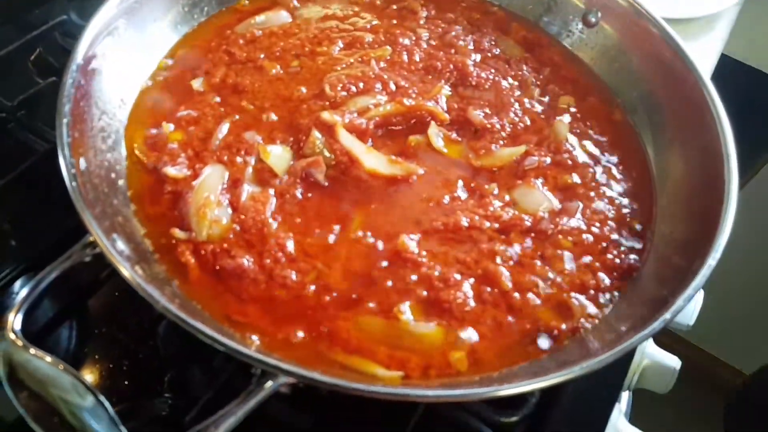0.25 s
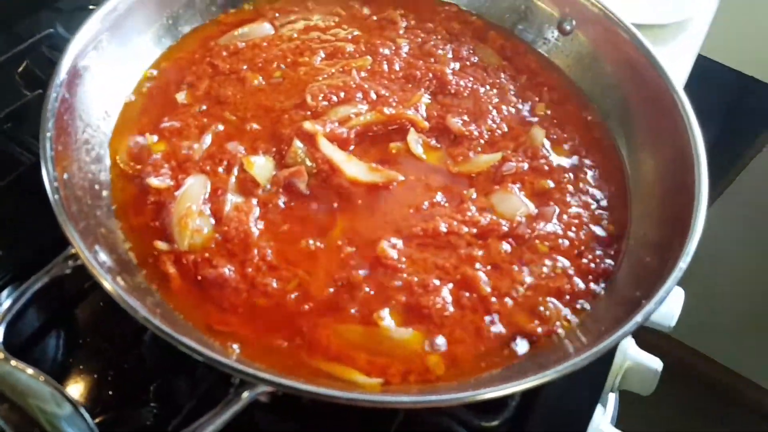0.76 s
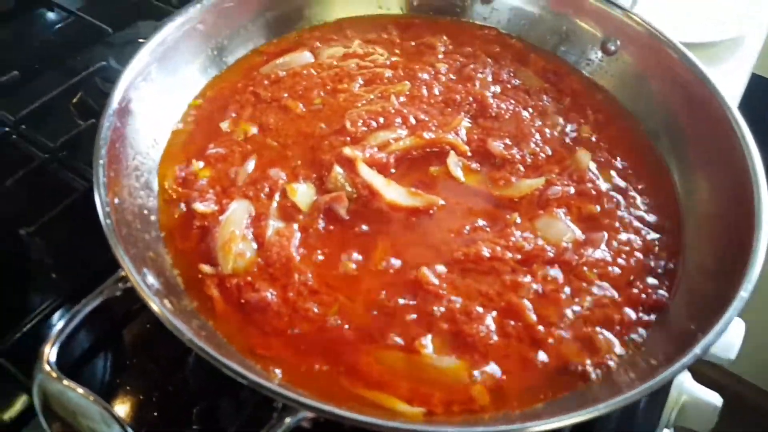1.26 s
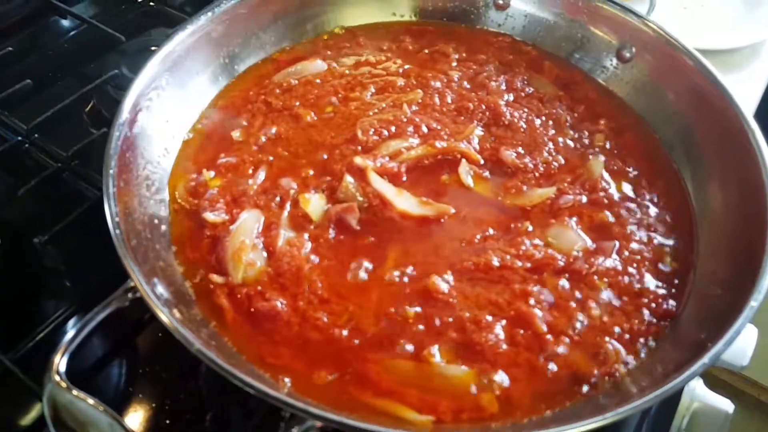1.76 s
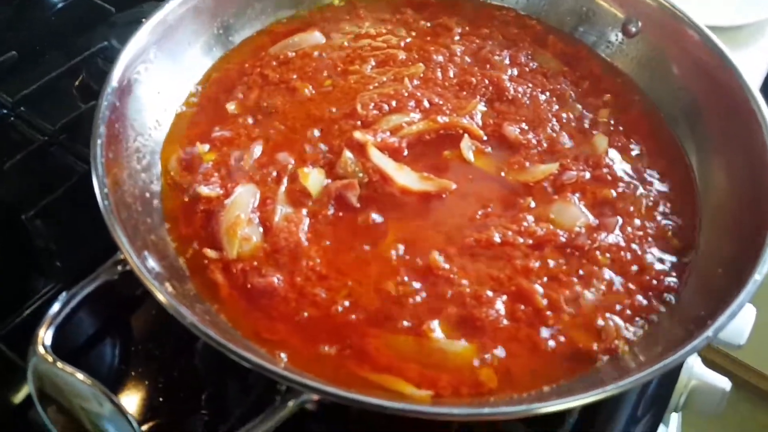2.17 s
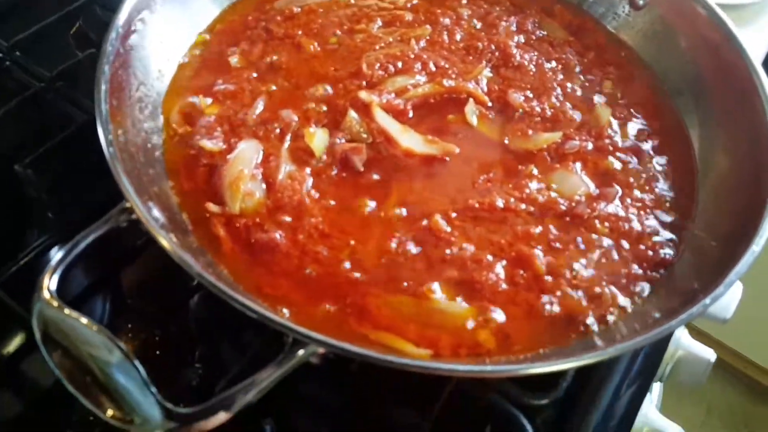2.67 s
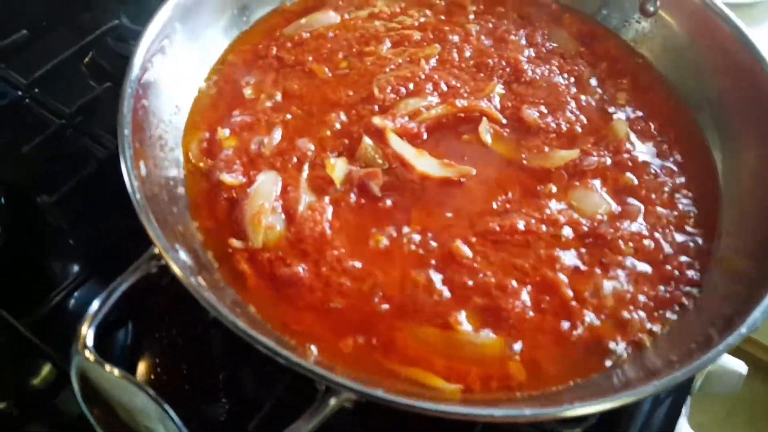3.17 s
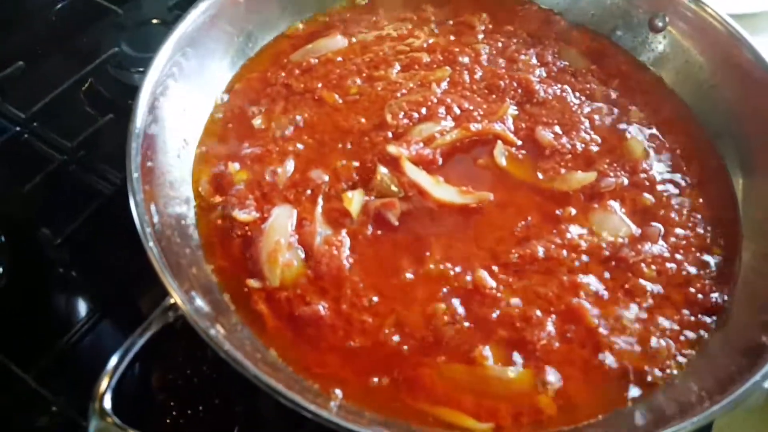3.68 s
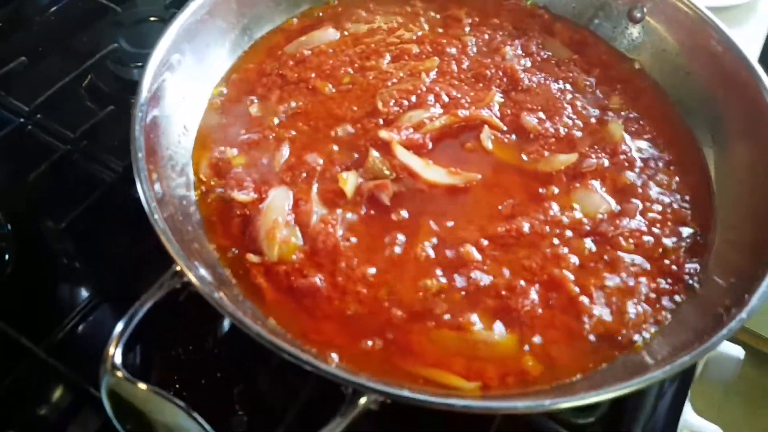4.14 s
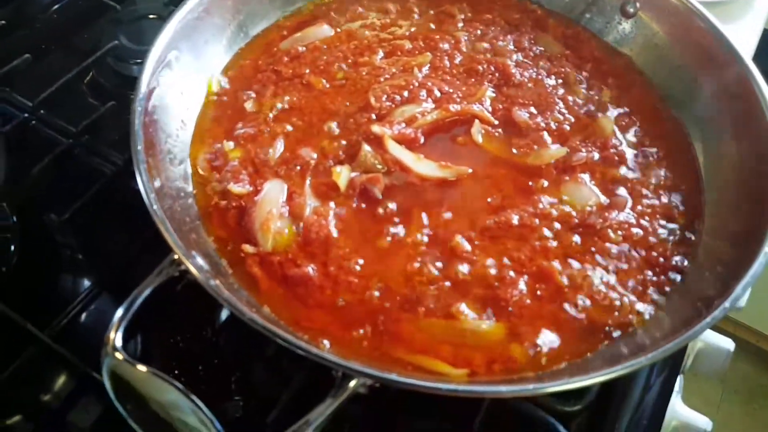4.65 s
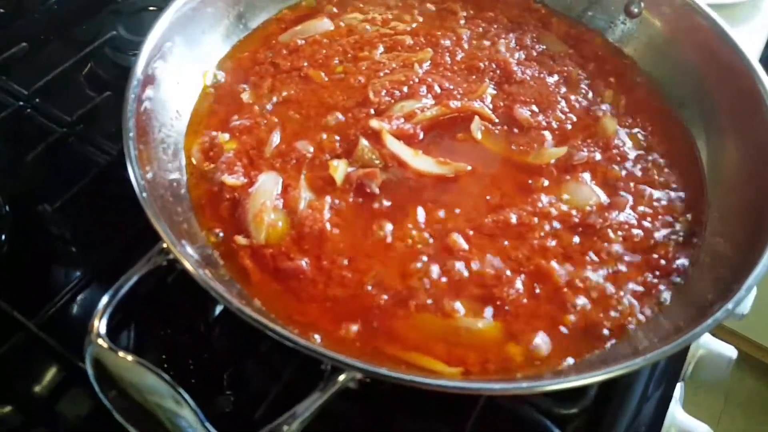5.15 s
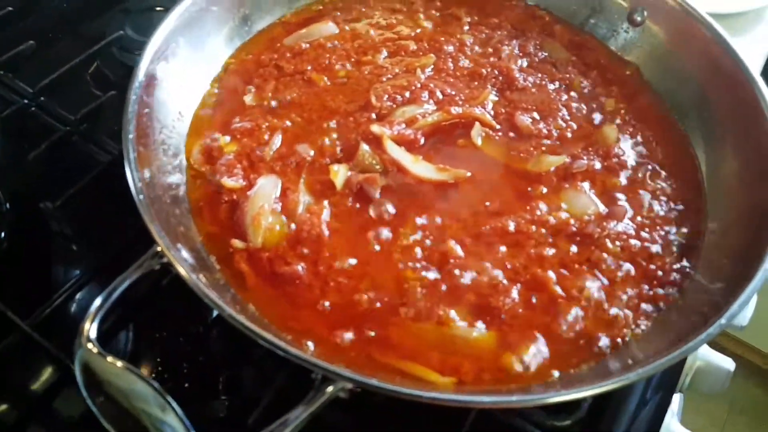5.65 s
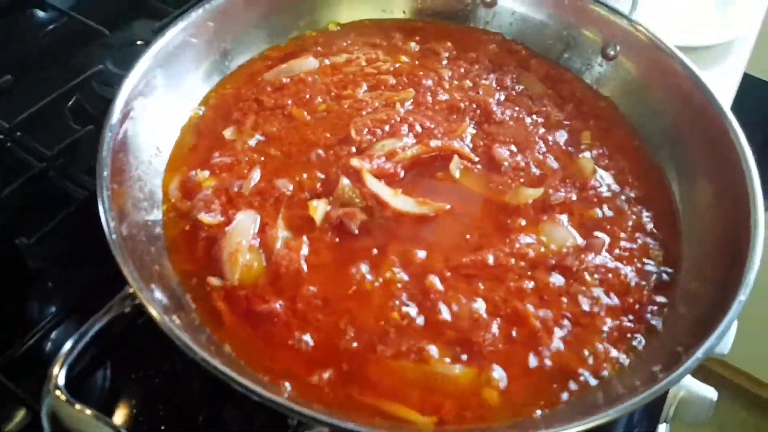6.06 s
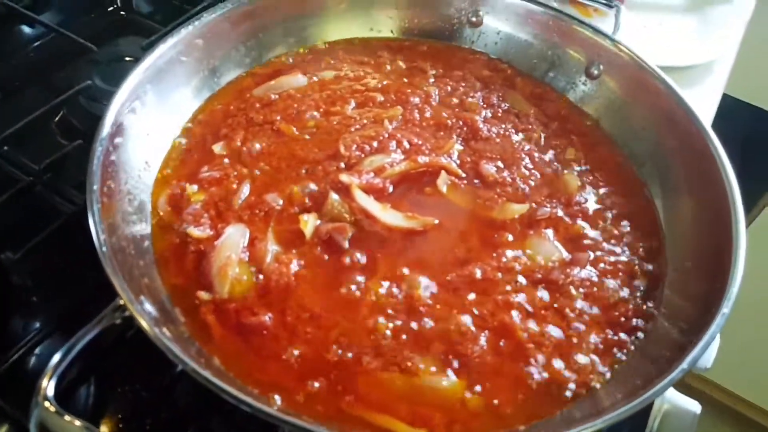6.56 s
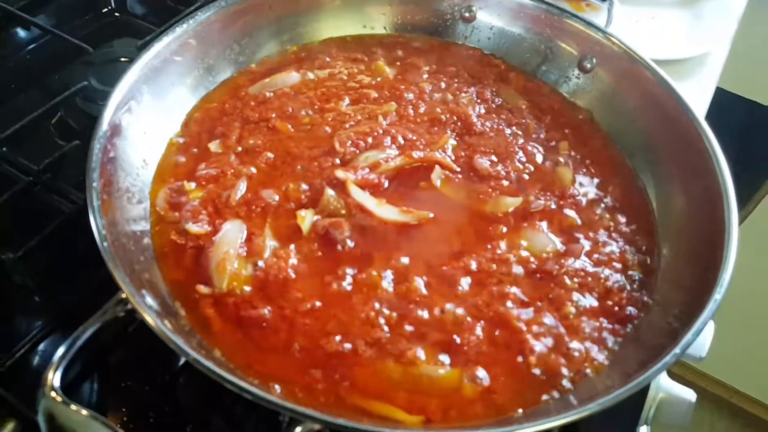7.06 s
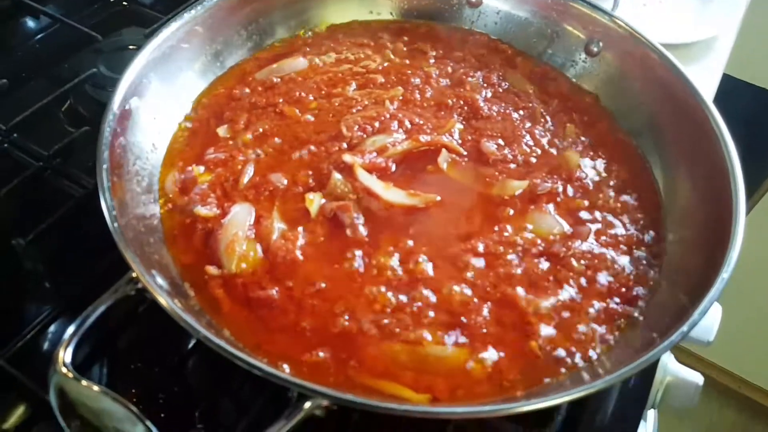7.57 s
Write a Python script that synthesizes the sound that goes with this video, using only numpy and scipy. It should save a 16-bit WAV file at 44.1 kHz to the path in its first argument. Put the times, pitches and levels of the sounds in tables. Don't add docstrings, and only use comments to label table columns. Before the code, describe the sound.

Close in a home kitchen, thick stew simmers steadily with steamy hiss, fine crackle and wet pops. Crockery clatters behind at the start and most heavily near 2.7 seconds. A hand-held stereo microphone, left side half covered by a finger, rumbles with low puffs. A hard knock at 3.4 seconds makes the simmer drop and slowly return; another near the end drops it again.

```python
import sys
import numpy as np
from scipy import signal
from scipy.fft import rfft, irfft, next_fast_len
from scipy.io import wavfile
from scipy.ndimage import uniform_filter1d, map_coordinates

SR = 44100
rng = np.random.default_rng(int(sys.argv[2]) if len(sys.argv) > 2 else 0)


def store_wav(level_fs):
    pcm = np.round(np.clip(np.atleast_2d(level_fs), -1, 1) * 32767)
    wavfile.write(sys.argv[1], SR, pcm.T.astype(np.int16))


def rack_gain(trim_db):
    fader = np.asarray(trim_db, float)
    return 10 ** (fader / 20)


N = 344862

# t/s, level/dB
GAIN_CURVE = [(0, -44), (.8, -43), (1.4, -43.5), (2, -45.5), (2.8, -43.5), (3.43, -45), (3.47, -49),
              (4.1, -51.5), (5.7, -51.5), (7.21, -44.5), (7.25, -50.5), (7.82, -51.5)]
# f/Hz, level/dB
BUFFET_SPECTRUM = [(12, -48), (28, -5), (45, 6), (65, 0.5), (100, -4.5), (160, -18), (250, -60), (500, -58),
                   (1000, -120)]
OPEN_DB = -46


def unit(x):
    return x / np.sqrt(np.mean(x ** 2) + 1e-20)


def along(points, hz):
    f, v = np.transpose(points)
    return np.interp(np.log(hz + 1), np.log(f + 1), v)


def wobble(rate):
    return map_coordinates(rng.standard_normal(int(N * rate / SR) + 4), [np.arange(N) * rate / SR])


def filtered(x, gain_db):
    m = next_fast_len(N + 8192)
    return irfft(rfft(x, m) * rack_gain(gain_db(np.fft.rfftfreq(m, 1 / SR))), m)[..., :N]


def add(track, s, sound):
    track[..., max(round(s * SR), 0):][..., :sound.shape[-1]] += sound


def lump(u, length, rise, fall):
    return np.exp(-.5 * (u / (length * np.where(u < 0, rise, fall))) ** 2)


def burst(hz, octaves, size):
    f = np.fft.rfftfreq(size, 1 / SR) + 1
    bell = np.exp(-.5 * (np.log2(f / hz) / max(octaves, .05)) ** 2)
    a, b, lumps = rng.standard_normal((3, size))
    lumps = rack_gain(1.5 * unit(uniform_filter1d(lumps, size=60)))
    ports = np.array([.8 * a + .6 * b, a])
    return unit(irfft(rfft(lumps * ports) * bell, size))


def steam_hiss(patchy_db):
    z = signal.stft(rng.standard_normal((2, N)), nperseg=512)[2]
    field = uniform_filter1d(rng.standard_normal(z.shape[1:]), size=8, axis=0)
    field = uniform_filter1d(field, size=8, axis=1)
    return signal.istft(z * rack_gain(patchy_db * unit(field)), nperseg=512)[1][:, :N]


def tiny_bubbles(rate, spread_db):
    when, size, pitch = rng.random((3, 4000))
    live = np.arange(4000) < rate * N / SR
    level = live * rack_gain(-spread_db * np.log(size + 0.03))
    t = np.arange(64) / SR
    hz = 8800 * 2 ** (1.5 * (pitch[:, None] - .5))
    ring = np.sin(2 * np.pi * hz * t) * hz * t * np.exp(-hz * t / 0.68)
    grain = level[:, None] * ring
    spot = (when[:, None] * (N - 64)).astype(int) + np.arange(64)
    return np.bincount(spot.ravel(), grain.ravel(), N)


def simmer(rate, spread_db, grain_db, patchy_db):
    # f/Hz, level/dB
    simmer_spectrum = [(80, -120), (150, 1), (220, -3), (350, 3), (600, -0.5), (1000, -5.5), (1600, -0.5),
                       (2800, -9.5), (5000, -6), (7000, -12), (10000, -12.5), (14000, -12), (15400, -21),
                       (16400, -26)]
    hiss = unit(steam_hiss(patchy_db))
    crackle = rack_gain(grain_db) * tiny_bubbles(rate, spread_db) * [[.6], [1]]
    swell = rack_gain(.7 * wobble(9))
    return swell * unit(filtered(hiss + crackle, lambda f: along(simmer_spectrum, f)))


def blurps(count):
    out, t = np.zeros(N + SR), np.arange(4096) / SR
    when, size, pitch = rng.random(count) * N / SR, *rng.standard_normal((2, count))
    levels = -13 + 3 * np.tanh(size)
    pitches = np.clip(1000 * 2 ** pitch, SR / 180, SR / 10)
    for s, db, hz in zip(when, levels, pitches):
        life = hz * t / 14
        phase = 2 * np.pi * hz * t * (1 + .06 * life / 2)
        add(out, s, rack_gain(db) * 8 * life * np.exp(-3 * life) * np.sin(phase))
    return out[:N]


def strays(count, octaves):
    when, size, pitch = rng.random(count) * (N / SR - .1), *rng.standard_normal((2, count))
    db = np.interp(when, *np.transpose(GAIN_CURVE)) - 9 + 3 * size
    hz = np.clip(9500 * 2 ** (0.45 * pitch), SR / 12, SR / 3)
    return list(zip(when, db, hz, np.full(count, octaves)))


def spits():
    # t/s, level/dB, centre f/Hz, width/octaves
    tears = [(0.265, -39.5, 2000, 2), (0.6688, -36.5, 6800, 4.9), (0.7586, -44, 7100, 1.7),
             (0.8233, -39, 7040, 0.82), (1.095, -42, 7010, 0.53), (1.137, -44, 6980, 0.29),
             (1.47, -35.5, 8000, 3.2), (1.506, -46, 12000, .4), (1.5276, -39.5, 3140, 1.3),
             (1.587, -41, 2890, 0.94), (1.7092, -42, 8060, 1.9), (2.4292, -37.5, 3380, 1.8),
             (2.5471, -46, 7160, 1.2), (2.7647, -34, 6650, 1), (2.8673, -30.5, 3800, 1.4),
             (2.956, -38, 3360, 0.36), (3.0195, -33, 7000, 2.5), (3.4256, -45.5, 3610, 1.1),
             (4.185, -49.5, 2980, 0.64), (4.6004, -52, 4950, 1), (5.03, -41, 11500, 1.1),
             (5.094, -45, 6710, 1.1), (5.4075, -51, 10500, .4), (5.564, -51, 6690, .91),
             (5.7793, -39, 11000, 0.93), (6.0945, -45, 10780, 0.59), (6.2873, -45, 7550, .74),
             (6.32, -45, 3370, 2.3), (6.903, -31.5, 12000, 1.1), (6.945, -31.5, 4000, 0.81),
             (2.2937, -48, 8058, 0.37), (3.2834, -59, 5320, .5), (3.3657, -52, 8250, .4),
             (4.468, -57, 8200, .3), (4.566, -53, 9500, .4), (4.608, -57, 11000, .5),
             (4.662, -64, 8500, .4), (4.786, -62, 6500, 0.52), (4.905, -54, 7005, .5),
             (5.0569, -58, 9500, 0.56), (5.414, -55, 10490, .4), (5.719, -54, 8500, .3),
             (5.743, -56, 10500, .4), (6.1917, -52, 6500, 0.46), (6.2357, -50, 11500, 0.54),
             (6.567, -48, 8200, .2)]
    # t/s, level/dB, f/Hz
    pings = [(.178, -48, 3650), (0.572, -46, 1450), (1.0455, -53, 5590), (1.2595, -37, 8200),
             (1.4937, -34.5, 7400), (1.7853, -48, 6300), (1.8852, -42, 3570), (2.078, -47, 3320),
             (2.726, -52, 8540), (3.027, -44, 4270), (3.3862, -49, 6880), (3.71, -59, 5690),
             (4.0098, -49, 4550), (4.215, -49, 8750), (4.7197, -44.5, 9490), (5.237, -51, 7050),
             (5.436, -52, 9600), (5.4597, -41.5, 6400), (5.617, -53, 8330), (5.6855, -49, 6660),
             (5.989, -50, 5700), (6.044, -49, 9270), (6.121, -45, 8100), (6.7396, -27, 5140),
             (7.0484, -41, 7540), (7.0738, -44, 6400), (7.1477, -47, 8500), (7.1731, -41, 11700),
             (7.7403, -49, 11400), (7.7638, -49, 7540)]
    ping_octaves, stray_octaves = .11, 0.46
    out, t = np.zeros((2, N + SR)), np.arange(4096) / SR
    bubbles = tears + [(*ping, ping_octaves) for ping in pings] + strays(200, stray_octaves)
    for s, db, hz, octaves in bubbles:
        click = np.sin(2 * np.pi * hz * t) * np.sqrt(t) * np.exp(-2.4 * octaves * hz * t)
        spray_db = 1.8 - 0.46 * max(db + 45.5, 0)
        spray_db -= 6 * (octaves == stray_octaves)
        spray_db -= 0.5 * np.log2(hz / 5960)
        spray_db -= 4 * min(octaves, 1)
        decay = rack_gain(spray_db - 60 * t / 0.084)
        tail = decay * (1 - np.exp(-t / 0.0004)) * burst(hz, octaves, size=4096)
        add(out, s + 0.00071, rack_gain(db) * (11 * click / np.linalg.norm(click) + tail))
    return out[:, :N]


def steam_puffs():
    # t/s, peak level/dB, f/Hz, length/s
    puffs = [(0.405, -19, 54.5, 0.031), (0.579, -13.5, 46.4, 0.03), (0.691, -12.5, 78, 0.0051),
             (0.924, -11, 57.3, 0.019), (1.302, -13.5, 57.3, .012), (1.48, -18.5, 46.8, 0.11),
             (1.956, -11, 63.6, 0.0099), (2.17, -17, 45.5, 0.046), (2.257, -18, 67, 0.0088),
             (2.387, -14, 54.3, 0.023), (2.574, -12.5, 75, 0.0062), (2.68, -10.5, 89, 0.012),
             (2.762, -10.5, 58, 0.0034), (3.044, -15, 52, .025), (3.133, -10, 59, 0.026),
             (3.545, -14, 44.2, 0.033), (3.82, 1.5, 49.4, 0.03), (3.987, -11, 61, 0.021),
             (3.703, -4.5, 47, 0.027), (5.185, -20.5, 45.6, .028), (5.703, -16, 43, 0.026),
             (6.308, -19, 61, 0.031), (6.342, -8.5, 84.4, 0.014), (6.465, -18, 61.5, 0.029),
             (6.614, -21, 87.4, 0.05), (6.92, -9, 45, 0.053), (6.89, -15, 100, .015),
             (6.982, -19.5, 53, 0.056), (7.101, -13.5, 67.5, 0.019), (7.304, -6, 66.3, 0.013)]
    # t/s, peak level/dB
    wafts = [(.019, -27), (0.104, -21), (0.462, -21), (0.845, -14), (1.113, -20.5), (1.411, -21),
             (1.543, -17.5), (1.679, -23), (1.878, -20), (2.629, -16), (2.855, -17.5), (4.389, -19),
             (4.694, -25), (4.777, -34), (5.092, -25), (5.365, -23.5), (5.511, -23.5), (5.578, -21.5),
             (5.84, -24), (6.06, -23), (6.691, -17), (6.873, -14), (7.174, -14), (7.669, -25)]
    waft_hz, waft_s = 61, 0.018
    out, u = np.zeros(N + SR), np.arange(8192) / SR - .06
    for s, db, hz, length in puffs + [(*waft, waft_hz, waft_s) for waft in wafts]:
        swing = np.cos(2 * np.pi * (hz * u + rng.random()))
        add(out, s - .06, rack_gain(db - 3.3) * lump(u, length, .35, .55) * swing)
    return out[:N]


def finger_knocks():
    # t/s, peak level/dB, quick extra turns/cycles, glide/s, edge/s
    knocks = [
        (3.446, 1.6, 0.48, 0.0064, 0.00043),
        (4.3234, -7, 0.46, 0.002, 0.00031),
        (4.999, -24.5, 0.37, 0.0011, 0.00039),
        (6.869, -12.5, 0.44, 0.0037, 0.00058),
        (7.222, 1, 0.85, 0.014, 0.00014),
    ]
    out, t = np.zeros(N + SR), np.arange(8192) / SR
    for s, db, turns, glide, edge in knocks:
        t60 = min(43 * glide, 0.16)
        u = np.maximum(t - .004, 0)
        jump = np.exp(np.minimum(t - .004, 0) / edge)
        late = 1 - min(edge / 0.00077, .7) * np.exp(-u / 0.0044)
        cycles = 41 * u + turns * (1 - np.exp(-u / glide))
        knock = rack_gain(db - 60 * u / t60) * jump * late * np.cos(2 * np.pi * cycles)
        soft = np.exp(-.5 * ((t[:128] - t[64]) / (0.23 * edge)) ** 2)
        add(out, s - .004, np.convolve(knock, soft / soft.sum())[64:])
    return out[:N]


def finger_taps():
    # t/s, peak level/dB, f/Hz, length/s
    taps = [(3.444, -19, 1570, 0.00045), (3.6869, -15.5, 210, 0.0014), (4.3, -31, 1700, .0005),
            (5.7, -25, 1200, .0004), (3.795, -35.5, 300, 0.0021), (3.957, -35, 630, 0.0019),
            (4.236, -42, 500, .002), (3.96, -16.5, 74, 0.0084), (4.239, -11.5, 66, 0.017),
            (6.4, -35, 600, .001), (6.3313, -11, 370, 0.0018), (6.362, -40, 1000, 0.0007),
            (6.33, -29, 520, 0.0026)]
    out, u = np.zeros(N + SR), np.arange(8192) / SR - .02
    for s, db, hz, length in taps:
        add(out, s + u[0], rack_gain(db) * lump(u, length, 0.18, 1) * np.cos(2 * np.pi * hz * u))
    return out[:N]


def steam_buffet():
    noise = rng.standard_normal(N) * rack_gain(2.2 * wobble(19))
    return unit(filtered(noise, lambda f: along(BUFFET_SPECTRUM, f)))


def finger_rustle(level_db):
    # f/Hz, level/dB
    rustle_spectrum = [(100, -1.5), (200, -2), (400, -14), (800, -22.5), (1500, -26), (3000, -31.5),
                       (5000, -120)]
    # middle t/s, rms level/dB, length/s
    rubs = [(0.345, -52, 0.078), (0.69, -49, 0.013), (1.15, -59, 0.14), (1.7, -55, 0.063),
            (2.306, -47, 0.03), (2.413, -34, 0.079), (2.697, -36, 0.1), (3.18, -51, 0.078),
            (3.337, -58, 0.012), (3.485, -50, 0.025), (3.955, -44, 0.025), (4.724, -45, 0.018),
            (4.893, -58.5, 0.18), (5.263, -56, 0.078), (6.323, -39, 0.028), (6.641, -40.5, 0.022),
            (6.913, -46, .04), (7.24, -44, 0.041)]
    noise = rng.standard_normal(N) * rack_gain(1.1 * wobble(40))
    t = np.arange(N) / SR
    sliding = sum(rack_gain(db) * lump(t - s, length, 1, 1) for s, db, length in rubs)
    return (rack_gain(level_db) + sliding) * unit(filtered(noise, lambda f: along(rustle_spectrum, f)))


def left_port():
    # t/s, level/dB
    steam_curve = [(0, -30.5), (.4, -37), (.75, -26), (1, -33), (1.6, -32), (2, -29), (2.6, -29.5),
                   (3.1, -32), (3.43, -26.5), (3.5, -31.5), (3.85, -30), (4.4, -32.5), (4.8, -36.5),
                   (5.9, -40), (6.4, -29.5), (6.6, -33), (7.21, -26), (7.4, -39.5)]
    skin_hz = 3660
    steam_db = np.interp(np.arange(N) / SR, *np.transpose(steam_curve))
    touches = steam_puffs() + finger_knocks() + finger_taps()
    touches = filtered(touches, lambda f: -20 * np.log10(1 + (f / skin_hz) ** 2))
    return touches + rack_gain(steam_db + 0.5) * steam_buffet() + finger_rustle(steam_db - 22)


def draught(ducked_db):
    noise = rng.standard_normal(N) * rack_gain(4.2 * wobble(3.1) + 2.4 * wobble(2.8))
    air = filtered(noise, lambda f: along(BUFFET_SPECTRUM, f) + 0.043 * f * (f < 200))
    return rack_gain(OPEN_DB - 11.5 + 0.89 * ducked_db) * unit(air)


def kitchen():
    # t/s, rms level/dB, centre f/Hz, width/octaves, t60/s
    clatter = [(.067, -34.5, 238, 0.97, 0.37), (0.1088, -29, 1310, 0.27, 0.069),
               (.118, -35, 940, 1.22, 0.34), (.288, -37.5, 660, 0.19, 0.2), (.165, -37.5, 1500, 0.59, 0.16),
               (.29, -40, 1090, 1.9, 0.3), (1.32, -40, 2120, 0.66, 0.56), (1.377, -38.5, 1970, 0.53, 0.49),
               (2.6342, -33, 800, 1.1, 0.27), (2.636, -39, 1900, .7, .35), (2.768, -43.5, 1500, .7, .35),
               (.105, -46, 2400, 0.56, .35), (.264, -47, 3300, .1, .06), (5.787, -40, 4900, 0.069, .16),
               (6.944, -40, 3460, .08, .06), (1.324, -39, 2450, .2, 0.23), (2.652, -28.5, 337, 1.1, 0.23),
               (2.766, -34, 7200, 0.26, 0.19), (2.766, -35, 490, 1.8, 0.42),
               (2.773, -35.5, 496, 0.92, 0.081), (2.8, -37, 614, 0.51, 0.15), (2.824, -37, 490, 0.9, 0.15),
               (3.54, -43, 517, 1.5, 0.16), (3.631, -40.5, 3100, 0.33, 0.27),
               (3.8994, -40.5, 686, 1.55, 0.28), (5.2452, -36.5, 5500, 2.1, 0.28),
               (5.285, -38.5, 965, 1.6, 0.2), (5.787, -36, 3600, 1.6, 0.26), (6.7396, -38.5, 4970, .2, 0.2),
               (6.946, -45, 5100, 0.15, .18), (6.414, -46, 8300, .2, 0.17), (6.683, -44, 6500, 0.43, .1)]
    # t/s, f/Hz, level/dB, t60/s
    rings = [(.115, 1179, -35, .2), (.118, 2191, -38, .3), (.27, 1130, -41, .35), (.285, 2196, -36, .25),
             (.286, 3350, -41, .15), (.165, 1200, -42, .3), (2.636, 404, -32, .25), (2.638, 820, -31, .25),
             (2.64, 614, -38, .25), (2.636, 1670, -35, .12), (2.77, 619, -33, .2), (2.772, 1340, -38, .2),
             (2.772, 1490, -40, .2), (2.775, 1060, -40, .2), (.12, 1530, -38, .2), (.29, 1500, -42, .2),
             (2.638, 1460, -35, .12), (2.768, 430, -31, .2), (3.545, 1520, -41, .06),
             (3.905, 1800, -43, .25), (3.9, 7050, -49, .2), (.1085, 1240, -22, .05),
             (.2635, 1190, -29, .035), (5.245, 8000, -40, .05), (1.313, 1350, -36, .08),
             (1.385, 2100, -39, .12), (3.302, 1250, -42, .06), (3.34, 1560, -43, .15),
             (3.545, 480, -42, .12), (6.7383, 5280, -32, .04), (6.9445, 3500, -30, .04),
             (1.33, 1700, -37, .12), (1.335, 2400, -36, .12), (1.35, 2900, -43, .12),
             (2.655, 1330, -35, .2), (.13, 690, -37, .12)]
    out, t = np.zeros((2, N + SR)), np.arange(16384) / SR
    for s, db, hz, octaves, t60 in clatter:
        rise = 1 - np.exp(-t / (0.0042 * t60))
        add(out, s, rack_gain(db - 60 * t / t60) * rise * burst(hz, octaves, size=16384))
    for s, hz, db, t60 in rings:
        waver = np.cumsum(rng.standard_normal(len(t))) * 0.0018
        phase = 2 * np.pi * (hz * t + waver + rng.random())
        add(out, s, rack_gain(db - 60 * t / t60) * (1 - np.exp(-t / 0.00051)) * np.sin(phase))
    return out[:, :N]


def body_resonance(sound):
    # f/Hz, width/Hz, lift/dB
    modes = [(490, 60, 3), (860, 60, 3), (1320, 150, 2), (3950, 350, 5), (5880, 300, 6), (8300, 450, 5),
             (9400, 150, 5), (12300, 100, 8), (12930, 150, 6), (13380, 180, 8), (13600, 80, 6)]
    return filtered(sound, lambda f: sum(db / (1 + (2 * (f - c) / w) ** 2) for c, w, db in modes) - 2.5)


def through_cover(sound, ducked_db):
    # f/Hz, level/dB
    cover_response = [(200, 6), (500, -7.5), (1000, -9), (2000, -10), (4000, -13), (6000, -23.5),
                      (6600, -116), (9000, -108), (9500, -21), (13000, -3), (15000, -31)]
    muffled = filtered(np.roll(sound, 8), lambda f: along(cover_response, f))
    return rack_gain(-2.5 + 0.37 * ducked_db + 3.9 * wobble(5.2)) * muffled


def scene():
    gain_db = np.interp(np.arange(N) / SR, *np.transpose(GAIN_CURVE))
    ducked_db = gain_db - OPEN_DB
    stew = simmer(rate=140, spread_db=3.5, grain_db=14.0, patchy_db=1.67) + blurps(count=260)
    sound = body_resonance(rack_gain(gain_db + 2.0) * stew + spits() + kitchen())
    left = through_cover(sound[0], ducked_db) + left_port()
    right = sound[1] + draught(ducked_db)
    return np.array([left, right])


def roll_off(x):
    return signal.sosfilt(signal.butter(12, 16470, fs=SR, output="sos"), x)


def record(dry):
    dry = filtered(dry, lambda f: along([(15480, 2), (15620, -18), (16400, -50)], f))
    mix = dry / (1 + np.abs(dry) ** 20) ** (1 / 20)
    return roll_off(mix)


dry = scene()
out = record(dry)
store_wav(out)
```